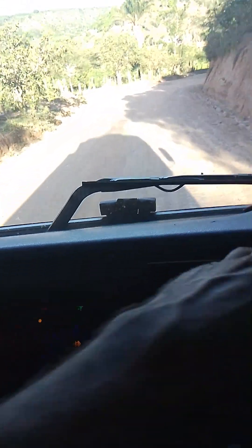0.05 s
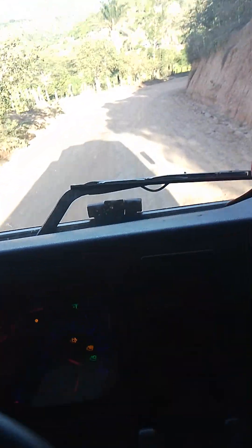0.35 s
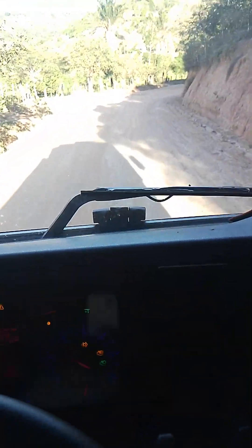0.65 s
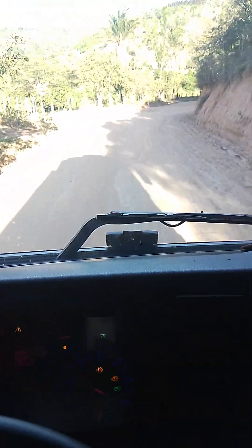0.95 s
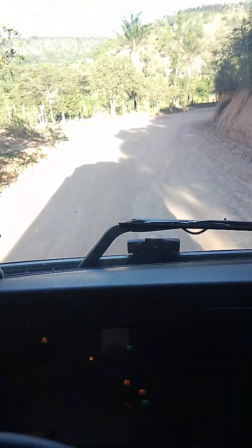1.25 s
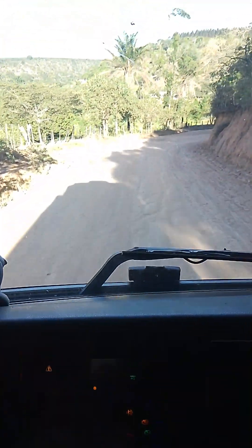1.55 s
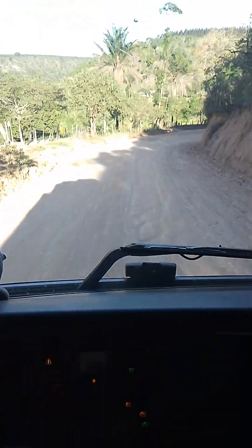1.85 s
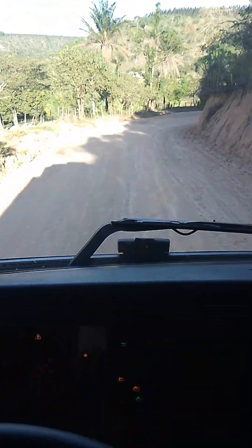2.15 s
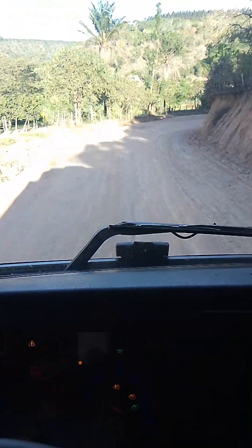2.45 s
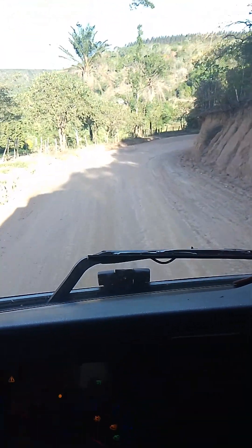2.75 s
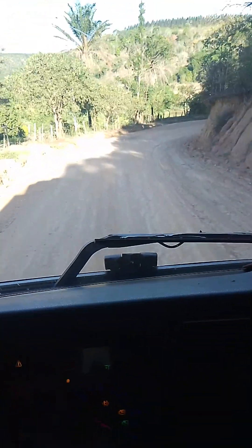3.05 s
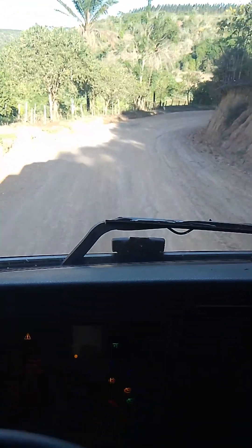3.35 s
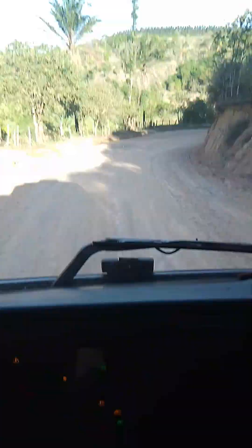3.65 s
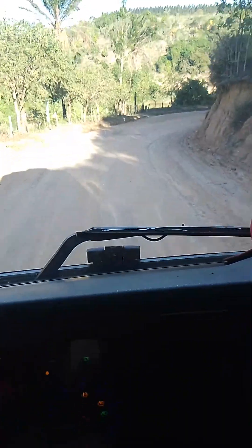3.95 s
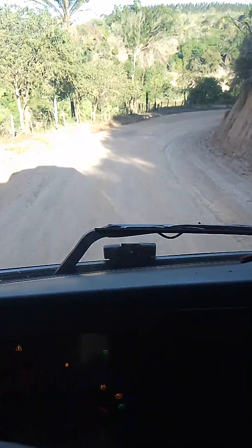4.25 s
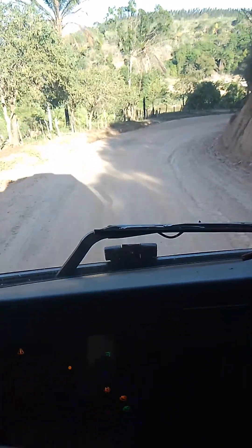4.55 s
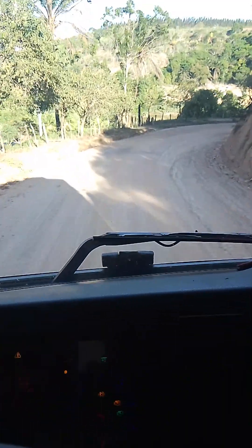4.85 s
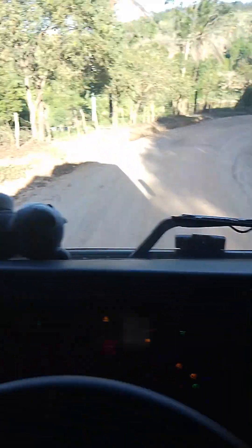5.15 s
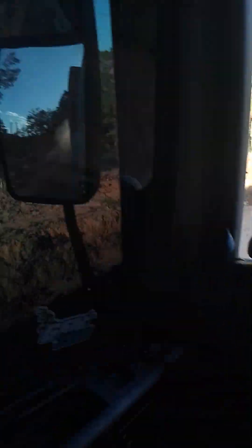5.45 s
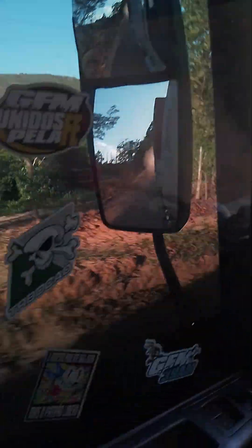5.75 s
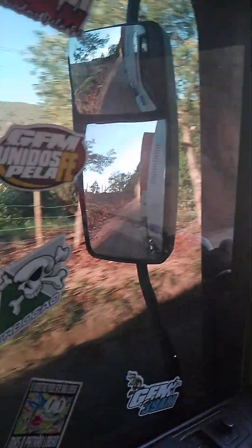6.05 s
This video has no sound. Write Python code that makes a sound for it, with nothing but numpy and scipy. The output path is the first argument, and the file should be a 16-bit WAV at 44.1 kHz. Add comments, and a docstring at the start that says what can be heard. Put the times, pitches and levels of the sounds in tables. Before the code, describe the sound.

Inside a truck cab on a rough dirt road: hollow booming and tyre rumble, with constant rattling, clicking and dull knocks.

```python
"""Inside the cab of a truck on a rough dirt road. From the start, road impacts drive the cab into a hollow
boom over tyre rumble, gravel, a low engine hum, rushing air and a faint sizzle; a friction squeal fades
within the first second. Jolts set trim, metal fittings and a plastic panel rattling at their resonances,
and bigger bumps knock through the body. The gravel falls quiet after one second and again near three;
the shaking is hardest near four seconds, and the rattling goes on to the end."""
import sys
import numpy as np
from scipy import signal
from scipy.fft import rfft, irfft
from scipy.io import wavfile
from scipy.ndimage import uniform_filter1d

SR = 44100
rng = np.random.default_rng(int(sys.argv[2]) if len(sys.argv) > 2 else 0)


def transcribe(signal):
    """Save signal, clipped to [-1, 1], as a 16-bit WAV file at the path in sys.argv[1]."""
    frames = np.atleast_2d(signal).T
    limited = np.clip(frames, -1, 1)
    pcm = np.round(limited * 32767).astype(np.int16)
    wavfile.write(sys.argv[1], SR, pcm)


N = 278756
TIME = np.arange(N) / SR
CONTACT_HZ = 6500  # bandwidth of a hard contact

# jolts that throw the fittings: t/s, relative blow level/dB, ring level/dB, bright level/dB, length/s
ROAD_JOLTS = [(0.0, -36, -68, -51.5, .021), (0.081, -38, -49, -61, .052), (0.21, -40, -62, -68, .015),
              (0.277, -46, -58, -69, 0.022), (0.41, -35.5, -50.5, -58, 0.0097),
              (0.514, -37, -58, -59, 0.018), (0.788, -45, -59, -78, .019), (0.824, -36.5, -49, -63, .02),
              (1.022, -43, -54, -65, 0.024), (1.475, -43, -49, -61, 0.0096),
              (1.551, -35.5, -43.5, -57, 0.012), (1.646, -29.5, -42, -57, 0.027),
              (1.743, -37.5, -59, -71, 0.017), (1.974, -39.5, -46.5, -73, 0.027),
              (2.384, -43.5, -57.5, -68, 0.031), (2.588, -35, -47, -56, 0.017),
              (2.642, -35.5, -49, -56, .017), (2.753, -40.5, -57.5, -66, 0.0096),
              (3.128, -37.5, -50.5, -59.5, 0.047), (3.214, -31.5, -45.5, -54.5, 0.018),
              (3.273, -35.5, -71, -62, 0.035), (3.317, -38.5, -72, -58.5, .04),
              (3.568, -33, -43.5, -53.5, 0.05), (3.616, -46, -51, -62, 0.022),
              (3.647, -38, -48.5, -58, .018), (3.675, -46, -49.5, -65, 0.025),
              (3.853, -33.5, -47.5, -53.5, 0.06), (3.96, -31, -51, -57, 0.014),
              (4.073, -32, -43, -52, 0.029), (4.169, -36, -50.5, -53.5, 0.022),
              (4.247, -35, -46.5, -55, 0.048), (4.398, -34.5, -47.5, -54.5, 0.066),
              (4.735, -42.5, -59.5, -71, 0.042), (4.818, -42, -56, -66, .015),
              (4.907, -34.5, -44.5, -50, 0.043), (5.013, -36.5, -65, -65, 0.021),
              (5.144, -39, -51.5, -66, .029), (5.238, -30.5, -64, -56, 0.015),
              (5.528, -47, -55, -63.5, 0.055), (5.642, -37.5, -55.5, -59, 0.033),
              (5.837, -41, -51.5, -59, 0.028), (5.977, -35.5, -54.5, -62, 0.044),
              (6.079, -37, -52, -60.5, 0.024), (6.222, -36.5, -58, -65, 0.026),
              (6.293, -36, -51, -55, 0.038)]
# how hard the trim and loose parts are shaken: t/s, relative level/dB
SHAKING_LEVEL = [(0.0, -55), (0.3, -65.5), (1.05, -62), (1.65, -54.5), (1.9, -58.5), (2.16, -53),
                 (2.59, -61), (3.7, -56), (4.1, -48), (4.82, -56), (5.25, -56), (5.44, -56.5), (5.67, -60),
                 (6.32, -61)]
# main modes of the metal fittings: f/Hz, bandwidth/Hz, gain/dB
METAL_MODES = [(2390, 600, -16), (3000, 38, -2.5), (3210, 120, -11), (3409, 46, 1), (3490, 73, 5),
               (3630, 25, 1.5), (3857, 89, 1), (3877, 32, 2), (3862, 130, -4.5), (4214, 31, -3.5),
               (4334, 35, -7)]


def from_db(db):
    """Amplitude ratio of a level in decibels."""
    return 10 ** (np.asarray(db) / 20)


def power_sum(a_db, b_db):
    """Incoherent sounds add in power; levels in dB."""
    return 10 * np.log10(from_db(a_db) ** 2 + from_db(b_db) ** 2)


def rms_one(x):
    """Normalisation to unit power."""
    return x / np.sqrt(np.mean(x ** 2) + 1e-20)


def in_time(curve):
    """Linear interpolation of a level curve at every sample."""
    return np.interp(TIME, *np.transpose(curve))


def add(out, s, sound):
    """Superposition of a sound starting at s seconds."""
    at = int(np.clip(round(s * SR), 0, N - 1))
    out[at:at + len(sound)] += sound[:N - at]


def drift(corner_hz):
    """Low-pass noise: a random fluctuation of unit rms."""
    hz = np.fft.rfftfreq(N, 1 / SR)
    return rms_one(irfft(rfft(rng.standard_normal(N)) / (1 + (hz / corner_hz) ** 2), N))


def colour(x, spectrum):
    """Source and filter: an excitation takes on a spectral envelope, at unit rms."""
    hz, db = np.transpose(spectrum)
    bins = np.maximum(np.fft.rfftfreq(N, 1 / SR), 1)
    envelope = from_db(np.interp(np.log(bins), np.log(hz), db))
    skirt = 1 / (1 + (bins / hz[-1] / 2) ** 4) / (1 + (hz[0] / bins / 2) ** 4)
    return rms_one(irfft(rfft(x) * skirt * envelope, N))


def even(x, span_s):
    """Division by the running rms holds the power steady over spans longer than span_s."""
    size = max(int(span_s * SR), 2)
    power = uniform_filter1d(uniform_filter1d(x ** 2, size), size)
    return x / np.sqrt(np.abs(power) + 1e-12)


def at_level(x, db, span_s):
    """Normalisation of a burst: its greatest short-time rms becomes db."""
    power = uniform_filter1d(x ** 2, max(int(span_s * SR), 2), mode="constant")
    return from_db(db) * x / np.sqrt(power.max() + 1e-20)


def contacts(per_s, spread_db, size=N):
    """A Poisson process of impulses of uneven strength."""
    hit = rng.random(size) < per_s / SR
    sign = rng.choice([-1, 1], size)
    return hit * sign * from_db(spread_db * np.minimum(rng.exponential(1, size), 4))


def soften(x, hz):
    """A finite contact time acts as a low-pass filter, passing little above hz."""
    return signal.sosfilt(signal.butter(4, min(hz, SR * .45), fs=SR, output="sos"), x + 1e-18)


def resonate(x, modes, scatter_db=0):
    """Superposed modes (f/Hz, bandwidth/Hz, gain/dB); the point of contact scatters their gains."""
    out = 0
    for k, (hz, width, db) in enumerate(modes):
        radius = np.exp(-np.pi * width / SR)
        gain = (-1) ** k * from_db(db + scatter_db * rng.standard_normal()) * (1 - radius ** 2) / 2
        feedback = [1, -2 * radius * np.cos(2 * np.pi * hz / SR), radius ** 2]
        out = out + gain * signal.lfilter([1, 0, -1], feedback, x + 1e-18)
    return out


def cab(x, t60_s=0.13, echo_db=-7):
    """Reverberation: dense, short reflections from glass and trim follow the direct sound."""
    t = TIME[:SR // 5]
    echoes = rng.standard_normal(len(t)) * from_db(-60 * t / t60_s) * (t > .002)
    return x + from_db(echo_db) * signal.fftconvolve(x, echoes / np.linalg.norm(echoes))[:len(x)]


def swell(t, length, rise_s, fall_s):
    """A driven vibration builds up for length seconds, then decays exponentially."""
    return (1 - np.exp(-t / rise_s)) * np.exp(-np.maximum(t - length, 0) / fall_s)


def held_modes(rows, rise_s, fall_s, rough):
    """Forced vibration: each sharp mode rings unevenly while shaken, then dies away."""
    out, t = np.zeros(N), TIME[:SR // 4]
    for s, db, length, hz in rows:
        rasp = rms_one(soften(rng.standard_normal(len(t)), hz / 16))
        envelope = from_db(db) * swell(t, length, rise_s, fall_s) * (1 + rough * rasp)
        add(out, s, envelope * np.sin(2 * np.pi * hz * t))
    return out


def ride():
    """Road excitation: surface and jolts add in power to give boom, gravel and trim levels in dB."""
    # drumming of the road on the cab between jolts: t/s, relative level/dB
    drumming = [(0.0, -34.0), (0.64, -38), (0.76, -39.5), (1.2, -36), (1.76, -38), (2.12, -35),
                (2.52, -41.5), (2.64, -38.5), (3.04, -38), (3.28, -33.0), (3.44, -39.5), (4.28, -38.5),
                (4.64, -33.5), (4.8, -37), (5.28, -35), (5.6, -36.5), (6.04, -36), (6.32, -38.3)]
    # loose gravel, with two smooth stretches: t/s, relative level/dB
    crunch = [(0.0, -48.5), (0.84, -52.5), (0.92, -65), (1.36, -76), (1.64, -53), (1.8, -61), (2.04, -41.5),
              (2.48, -49), (2.68, -52), (2.92, -57), (3.08, -55), (3.2, -44), (3.48, -45), (3.92, -45),
              (4.84, -48), (6.2, -44), (6.32, -42.5)]
    jolts, t = np.zeros(N), TIME[:SR // 4]
    for s, blow_db, *_, length in ROAD_JOLTS:
        add(jolts, s, from_db(blow_db) * swell(t, length, rise_s=0.0055, fall_s=0.015))
    jolt_db = 20 * np.log10(jolts + 1e-9)
    ruts = drift(corner_hz=12.6)  # small ruts sway all three together
    boom_db = power_sum(in_time(drumming) + 1.37 * ruts, jolt_db - 5.5)
    gravel_db = power_sum(in_time(crunch) - 0.17 + 2 * ruts, jolt_db - 10.5)
    trim_db = power_sum(in_time(SHAKING_LEVEL) - 1.6 + 2.5 * ruts, jolt_db - 15)
    return boom_db, gravel_db, trim_db


def boom(level_db):
    """Random impacts of stones and ruts excite the hollow resonances of the cab."""
    # response of the cab: f/Hz, relative spectral level/dB
    spectrum = [(165, -34), (195, -18.5), (250, -4.5), (290, -0.5), (315, -1.5), (350, 1.5), (385, -3.5),
                (410, 4), (460, -4.5), (520, -6.5), (600, -12), (800, -25), (1200, -34), (2500, -41)]
    impacts = contacts(per_s=1300, spread_db=2.16)
    return from_db(level_db) * even(colour(impacts, spectrum), span_s=0.062)


def gravel(level_db):
    """Shot noise: many small contacts under the tyres merge into a crunch."""
    # crunch of gravel: f/Hz, relative spectral level/dB
    spectrum = [(500, 8.5), (600, -12), (660, 6.5), (770, 6.5), (890, 9), (980, -1), (1120, -35),
                (1260, -8), (1600, -22), (2100, -14.5), (2700, -22), (3700, -25), (5200, -24.5),
                (7000, -35.5)]
    stones = contacts(per_s=2200, spread_db=3.8)
    return from_db(level_db) * even(colour(stones, spectrum), span_s=0.063)


def trim(level_db):
    """Impact excitation: shaken trim chatters at its natural frequencies."""
    # modes of dashboard and door trim: f/Hz, bandwidth/Hz, gain/dB
    modes = [(660, 22, -12), (1020, 48, 1), (1151, 59, -4.5), (1310, 36, -16), (1394, 54, -16),
             (1684, 30, -17.5), (2340, 76, -19)]
    taps = soften(contacts(per_s=900, spread_db=4.3), CONTACT_HZ)
    return from_db(level_db) * even(cab(resonate(taps, modes)), span_s=0.07)


def rumble():
    """Random vibration of tyres and chassis radiates low-frequency noise."""
    # response of tyres and chassis: f/Hz, relative spectral level/dB
    spectrum = [(18, -8), (27, -3), (38, -30), (52, -7), (66, 3), (80, 3.5), (100, -0.5), (130, -1),
                (162, -19), (220, -4)]
    # strength of their vibration: t/s, relative level/dB
    strength = [(0.0, -53.5), (1.8, -53), (2.12, -49.5), (2.4, -54.5), (3.24, -52.5), (3.4, -56.5),
                (3.72, -49), (4.48, -56), (4.56, -48), (5.32, -54), (5.36, -46), (5.56, -53.5),
                (5.84, -50.5), (6.32, -54)]
    vibration = even(colour(rng.standard_normal(N), spectrum), span_s=0.11)
    return from_db(in_time(strength) + 1.5) * vibration


def engine(firing_hz=80.3, level_db=-63):
    """Structure-borne sound: the firing frequency hums through the floor, wavering with the load."""
    phase = 2 * np.pi * np.cumsum(firing_hz * (1 + 0.0068 * drift(2.7))) / SR
    return from_db(level_db + 0.83 * drift(2.3)) * np.sqrt(2) * np.sin(phase)


def air(level_db=-68):
    """Flow noise: air rushes steadily around the cab."""
    # rush of air: f/Hz, relative spectral level/dB
    spectrum = [(900, -11), (1600, 13), (2400, -5.5), (4000, -0.5), (6000, -27), (9000, -34)]
    return from_db(level_db) * colour(rng.standard_normal(N), spectrum)


def sizzle(beat_hz=30, dip_every_s=0.3):
    """Amplitude-modulated noise: a faint electronic sizzle sputters to a beat, with brief regular dips."""
    # sizzle: f/Hz, relative spectral level/dB
    spectrum = [(1000, 7), (4000, 2), (7000, -1.5), (10000, -2), (16000, -4.5)]
    from_dip_s = (TIME - .058 + dip_every_s / 2) % dip_every_s - dip_every_s / 2
    dip = np.exp(-(from_dip_s / .016) ** 2)
    beat = np.cos(np.pi * beat_hz * (TIME - .017)) ** 6
    modulation = drift(170) + .2 + 1.3 * beat - 3.5 * dip
    sputter_db = 6.55 * np.tanh(2 * modulation)
    return from_db(-66.5 + sputter_db) * colour(rng.standard_normal(N), spectrum)


def squeal(hz=1024):
    """Friction-induced vibration, perhaps of a brake: a thin tone that wavers and flutters."""
    # rise and fall of the squeal: t/s, level/dB
    levels = [(0, -78), (0.15, -54), (0.5, -48.5), (0.78, -53.5), (0.9, -62), (1.0, -100)]
    phase = 2 * np.pi * np.cumsum(hz * (1 + .015 * drift(50))) / SR
    flutter_db = 2.5 * drift(60)
    return from_db(in_time(levels) + flutter_db) * np.sqrt(2) * np.sin(phase)


def squeaks():
    """Light damping lets a thin metal part ring on after each squeak."""
    # squeaks: t/s, level/dB, length/s, f/Hz
    events = [(0.0, -38.5, 0.0065, 3880), (0.0, -52, 0.025, 4300), (0.026, -45.5, 0.028, 4230),
              (0.087, -37, 0.018, 3877), (0.09, -57, 0.03, 4234), (3.322, -58, 0.016, 4650),
              (3.648, -50, 0.008, 5220), (4.172, -50.5, 0.012, 5230), (4.95, -59, 0.061, 3000),
              (5.148, -57, 0.01, 5200)]
    return held_modes(events, rise_s=0.0015, fall_s=0.018, rough=0.27)


def chatter(length, per_s, settle_s, after_db):
    """Intermittent contact: a loose part lands, bounces while shaken and settles with faint rebounds."""
    t = TIME[:SR // 4]
    landing = 1.35 * (t == 0)
    shake = np.exp(-np.maximum(t - length / 2, 0) / settle_s)
    rebounds = from_db(after_db) * np.exp(-t / 0.043)
    return landing + (shake + rebounds) * contacts(per_s, spread_db=2.6, size=len(t))


def fittings():
    """Repeated impacts ring the metal fittings at each jolt; their mounting gives a short clack."""
    # bright modes of the fittings: f/Hz, bandwidth/Hz, gain/dB
    bright_modes = [(4490, 280, 5), (4600, 1900, -4), (5016, 64, 8), (5235, 63, 5.5), (5340, 38, 4),
                    (5430, 180, -4), (5790, 78, 0.5), (6460, 2300, -20.5)]
    # modes of the hollow panel that carries them: f/Hz, bandwidth/Hz, gain/dB
    mount_modes = [(410, 37, 5), (675, 27, 2), (730, 10, -1), (796, 27, 0), (1026, 14, -11), (1086, 24, -6),
                   (1423, 56, -16.5), (1680, 22, -19), (1900, 180, -19.5)]
    out = np.zeros(N)
    for s, blow_db, ring_db, bright_db, length in ROAD_JOLTS:
        taps = soften(cab(chatter(length, per_s=700, settle_s=0.0046, after_db=-10.5)), CONTACT_HZ)
        blow = soften(cab(chatter(length / 2, per_s=500, settle_s=0.0079, after_db=-24)), hz=2360)
        add(out, s, at_level(resonate(taps, METAL_MODES, scatter_db=2.5), ring_db, length))
        add(out, s, at_level(resonate(taps, bright_modes, scatter_db=2.5), bright_db, length))
        add(out, s, at_level(resonate(blow, mount_modes), blow_db - 3, length / 2))
    return out


def light_rattle(trim_db):
    """Weak random impacts keep the plastic panel ticking and the fittings jangling between jolts."""
    tick_modes = [(2020, 69, -4), (2090, 80, -5), (2154, 8.8, -9)]
    ticking = cab(resonate(contacts(per_s=320, spread_db=4.3), tick_modes))
    taps = soften(contacts(per_s=380, spread_db=2.1), CONTACT_HZ)
    jangle = cab(resonate(taps, METAL_MODES))
    return from_db(trim_db - 10.5) * rms_one(ticking) + from_db(trim_db - 12) * rms_one(jangle)


def faint_buzzes(count=90, gap_s=0.11):
    """Random contacts of panel and seat, harder when shaken more: rows of t/s, level/dB, f/Hz."""
    gap, strength, pitch = rng.standard_normal((count, 3)).T
    times = np.cumsum(gap_s * np.exp(gap / 2))
    db = np.interp(times, *np.transpose(SHAKING_LEVEL)) - 1 + 2.2 * strength
    hz = 2060 + 43 * pitch
    return [row for row in zip(times, db, hz) if row[0] < TIME[-1]]


def panel_buzz(length_s=0.015):
    """Rapid impacts against its seat excite a cluster of close modes in a plastic panel."""
    # loudest buzzes: t/s, level/dB, f/Hz
    loud_buzzes = [(0.045, -52, 2060), (0.132, -49.5, 1980), (0.24, -48.5, 2080), (0.519, -45, 2040),
                   (0.583, -55, 2120), (0.669, -50.5, 2060), (1.096, -52.5, 2056), (1.243, -52, 2070),
                   (1.411, -52, 2040), (1.556, -51, 2040), (2.22, -49, 2230), (2.897, -51.5, 2090),
                   (3.151, -47.5, 2070), (3.389, -48, 2060), (3.62, -46.5, 2075), (3.647, -44.5, 2090),
                   (3.678, -38.5, 2200), (3.748, -47.5, 2010), (3.859, -43, 2037), (3.896, -41.5, 2060),
                   (3.966, -38, 2080), (4.068, -55, 2100), (4.116, -44.5, 2020), (4.312, -45, 2020),
                   (4.413, -45, 2020), (4.67, -48, 2040), (4.906, -50, 2020), (4.962, -47, 2020),
                   (5.014, -52, 2010), (5.05, -49, 2040), (5.085, -45, 2000), (5.24, -46.5, 2000),
                   (5.325, -47.5, 2020), (5.372, -48.5, 2040)]
    out = np.zeros(N)
    for s, db, hz in list(loud_buzzes) + faint_buzzes():
        taps = soften(cab(chatter(length_s, per_s=900, settle_s=0.0063, after_db=-18)), hz=4130)
        modes = [(1135, 45, -3), (1410, 35, -11), (1800, 900, -25),
                 (hz - 40, 65, 0), (hz + 40, 65, -1), (3597, 60, -13)]
        add(out, s, at_level(resonate(taps, modes, scatter_db=1.5), db, length_s))
    return out


def knocks():
    """Damped impulse response: a blunt blow rings the body for a few cycles."""
    # bigger bumps: t/s, peak level/dB, f/Hz
    bumps = [(0.191, -21, 378), (0.501, -26, 495), (1.373, -33, 500), (1.665, -22, 394), (1.674, -17, 335),
             (1.690, -25, 380), (3.247, -24, 346), (3.294, -25, 344), (3.828, -24, 487), (4.079, -22, 423),
             (4.531, -22, 397), (4.63, -24.5, 330), (4.675, -24.5, 365), (5.324, -23.5, 355),
             (5.985, -23.5, 370)]
    out, impulse = np.zeros(N), signal.unit_impulse(SR // 6)
    for s, db, hz in bumps:
        blow = soften(resonate(impulse, [(hz, 330, 0)]), hz=1050)
        body = resonate(blow, [(275, 120, -3), (hz, 150, 0), (500, 120, -2), (720, 120, -7)])
        add(out, s, from_db(db) * body / np.abs(body).max())
    return out


def drones():
    """Resonance: shaken cab panels swell into a brief drone or a hollow bonk."""
    # swells of the panels: t/s, level/dB, length/s, f/Hz
    events = [(0.215, -33.5, 0.058, 395), (0.395, -36, 0.046, 410), (1.11, -34, 0.075, 425),
              (1.243, -30, 0.035, 335), (2.11, -26, 0.023, 373), (3.284, -32, 0.018, 346),
              (3.565, -36.5, 0.021, 730), (4.10, -29.5, 0.018, 335), (4.41, -37, 0.025, 734),
              (4.625, -35.5, 0.03, 362), (4.912, -26, 0.008, 700), (5.30, -30, 0.03, 382.6),
              (5.838, -35, 0.02, 660), (6.296, -26.5, 0.008, 660)]
    return held_modes(events, rise_s=0.0026, fall_s=0.0061, rough=0.38)


def scene():
    """Superposition of all sources at the driver's seat."""
    boom_db, gravel_db, trim_db = ride()
    road = boom(boom_db) + gravel(gravel_db) + trim(trim_db) + rumble()
    body = knocks() + drones()
    background = air() + engine() + squeal() + sizzle()
    loose_parts = squeaks() + fittings() + panel_buzz() + light_rattle(trim_db)
    return (road + body + background + loose_parts)[None]


def record(dry):
    """A steep low-pass filter removes the highest treble."""
    cutoff_hz = 15900
    return signal.sosfilt(signal.ellip(12, .1, 70, cutoff_hz, fs=SR, output="sos"), dry)


dry = scene()
out = record(dry)
transcribe(out)
```